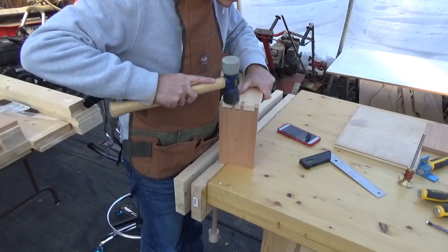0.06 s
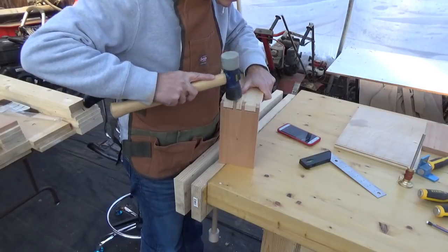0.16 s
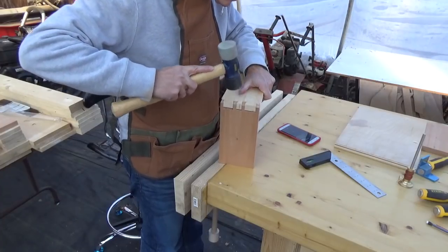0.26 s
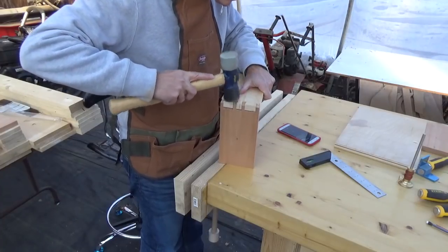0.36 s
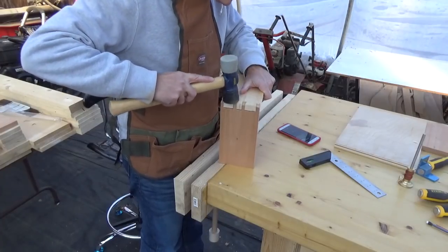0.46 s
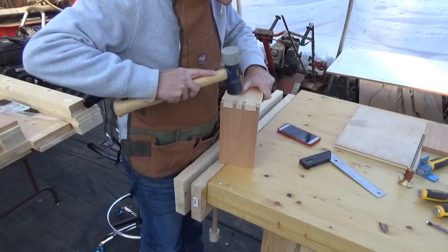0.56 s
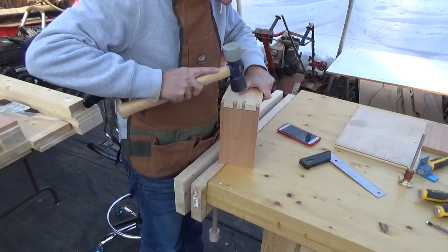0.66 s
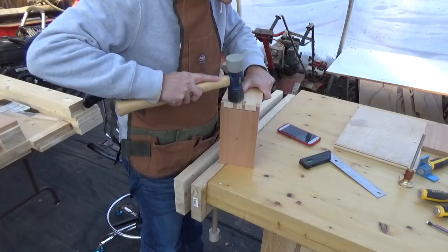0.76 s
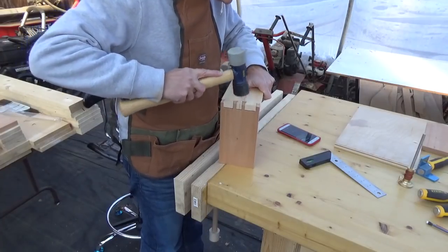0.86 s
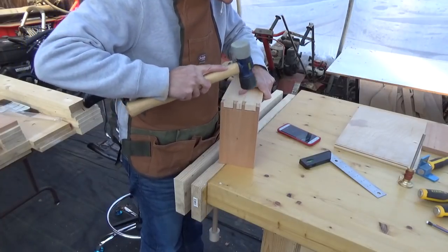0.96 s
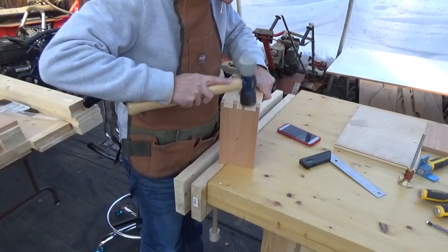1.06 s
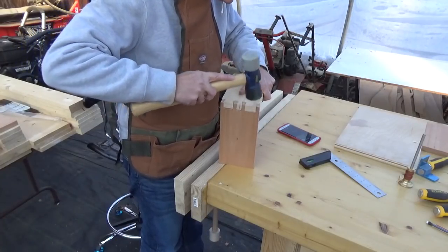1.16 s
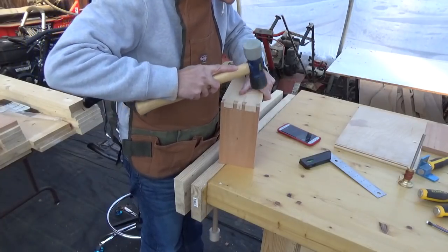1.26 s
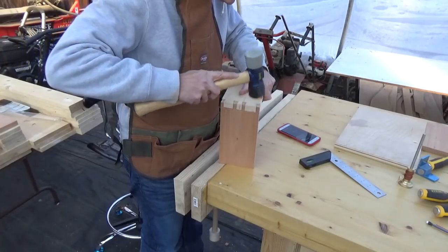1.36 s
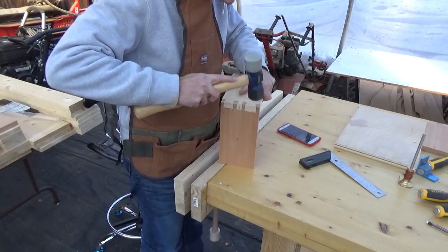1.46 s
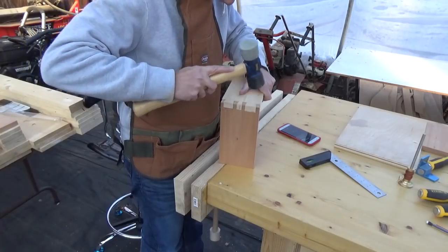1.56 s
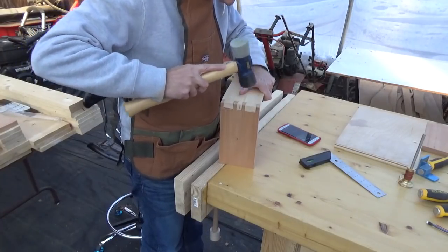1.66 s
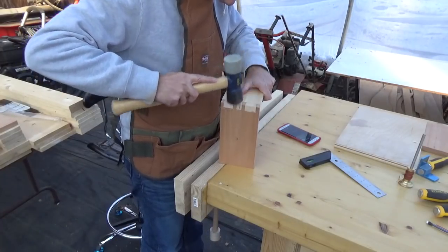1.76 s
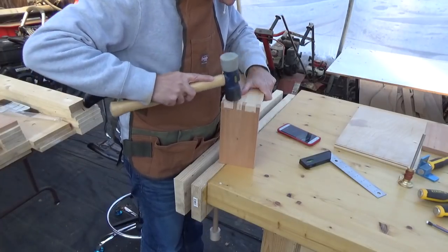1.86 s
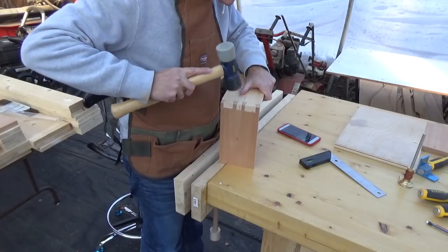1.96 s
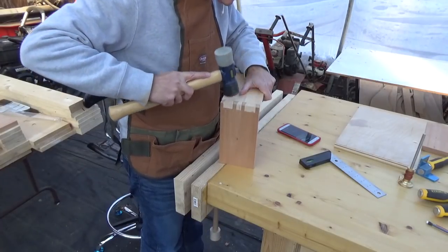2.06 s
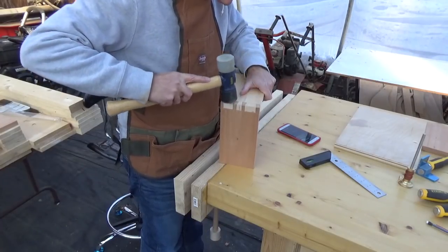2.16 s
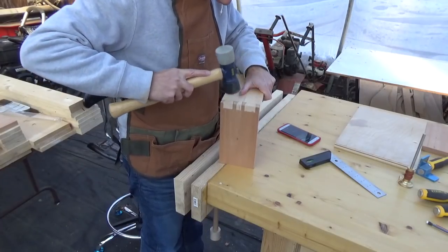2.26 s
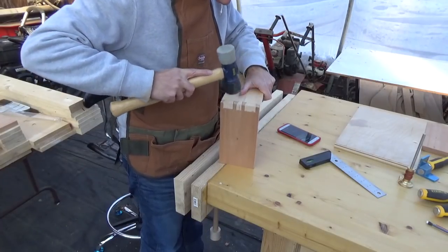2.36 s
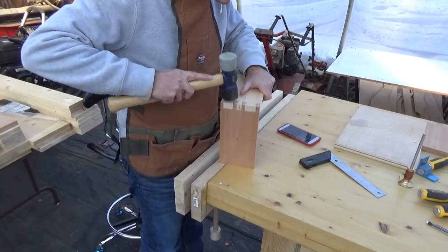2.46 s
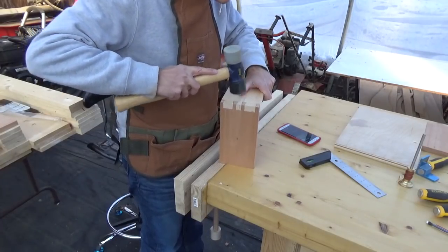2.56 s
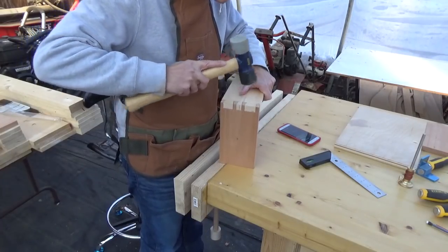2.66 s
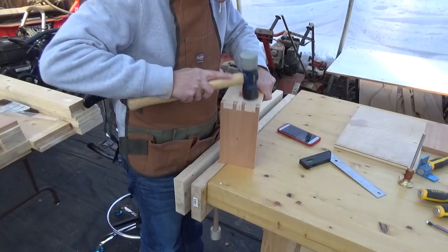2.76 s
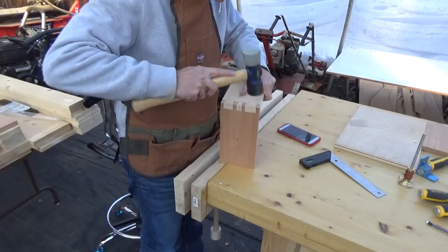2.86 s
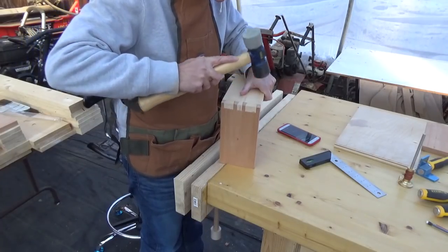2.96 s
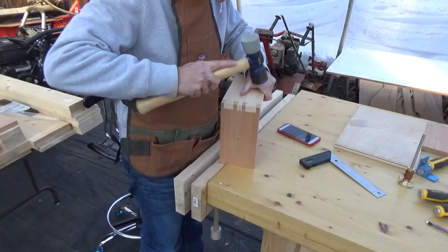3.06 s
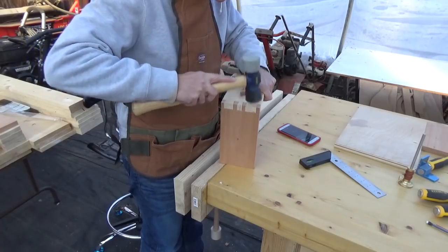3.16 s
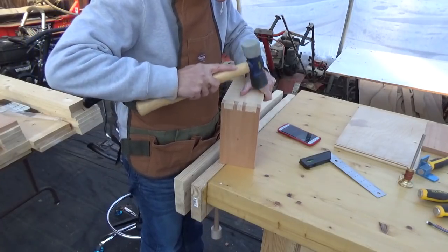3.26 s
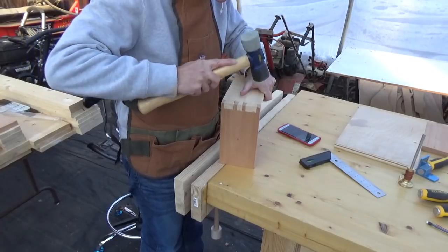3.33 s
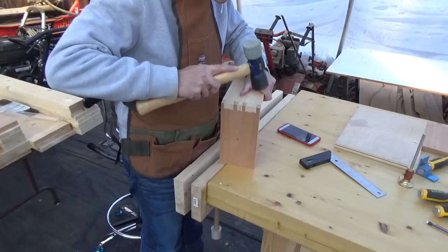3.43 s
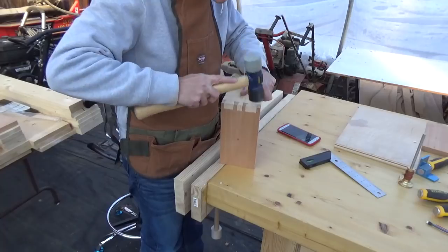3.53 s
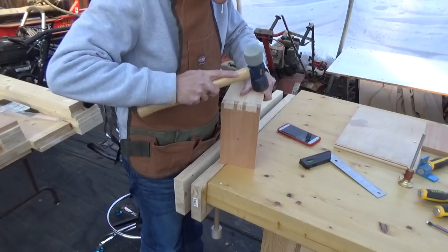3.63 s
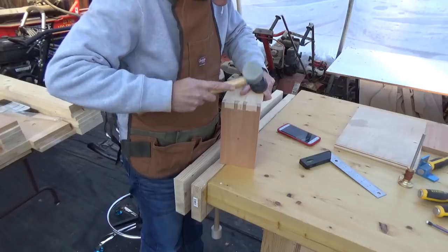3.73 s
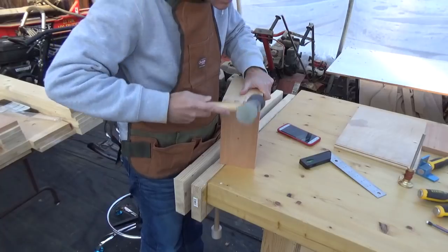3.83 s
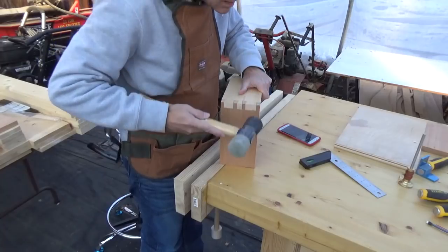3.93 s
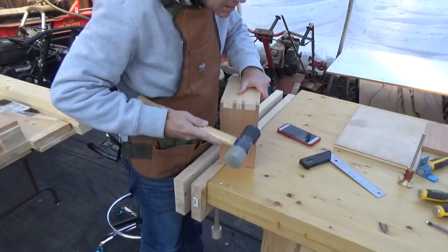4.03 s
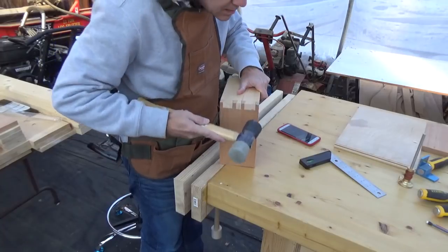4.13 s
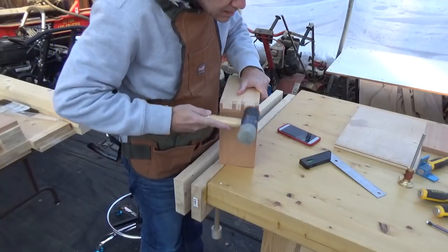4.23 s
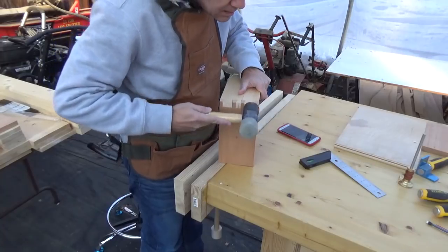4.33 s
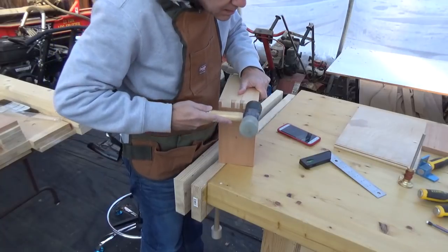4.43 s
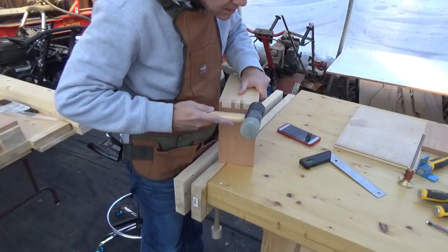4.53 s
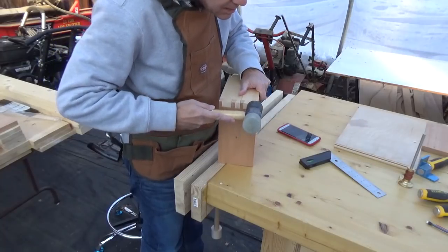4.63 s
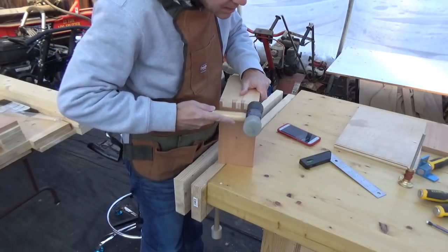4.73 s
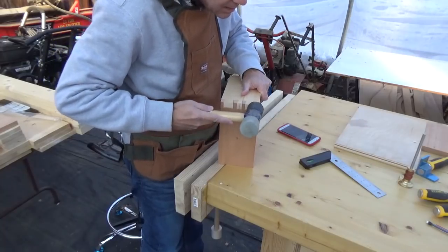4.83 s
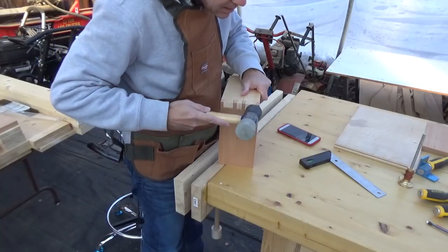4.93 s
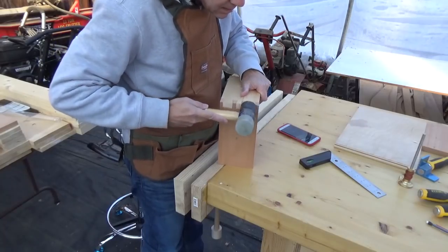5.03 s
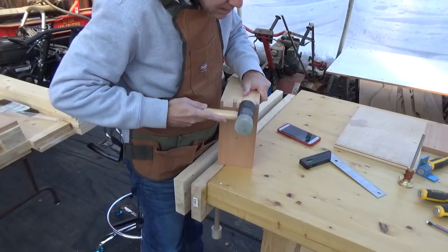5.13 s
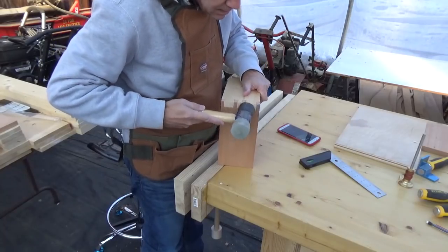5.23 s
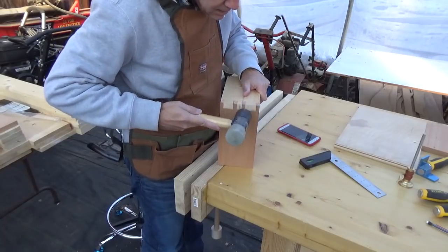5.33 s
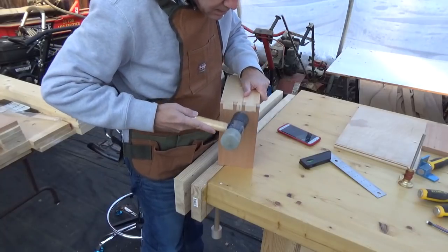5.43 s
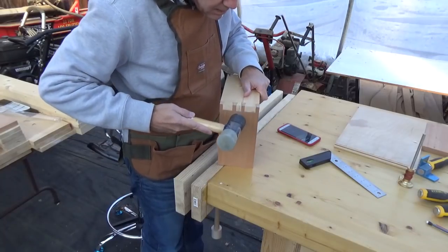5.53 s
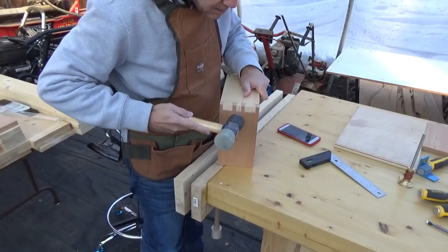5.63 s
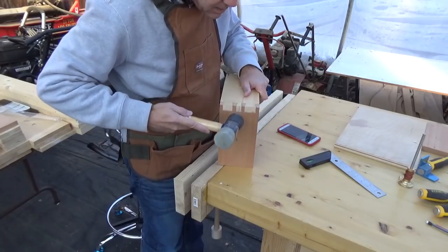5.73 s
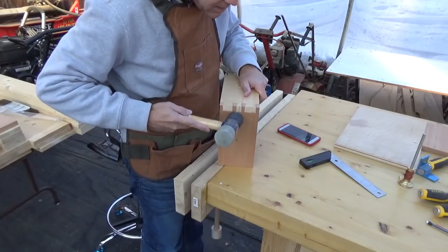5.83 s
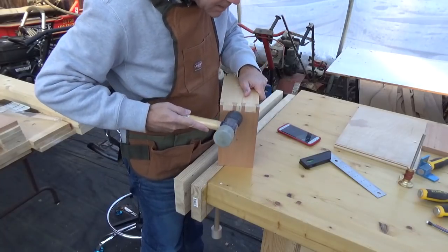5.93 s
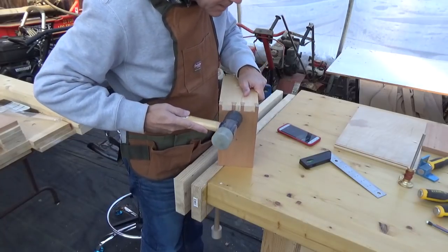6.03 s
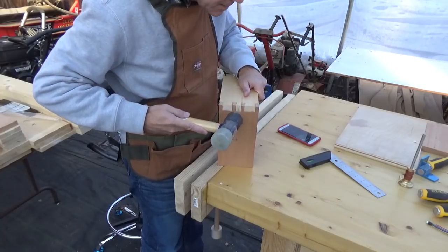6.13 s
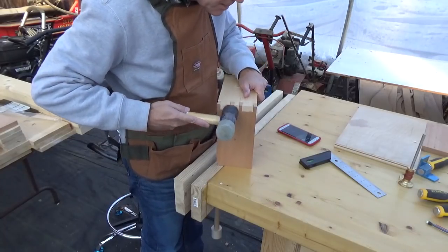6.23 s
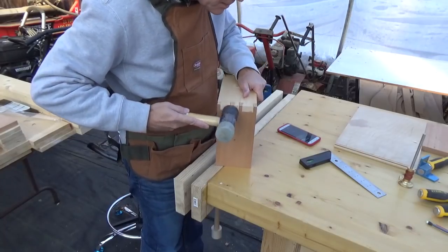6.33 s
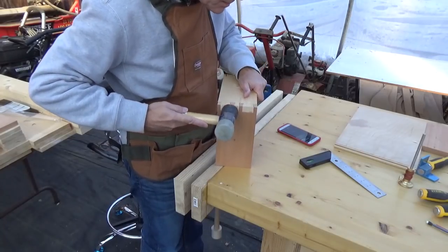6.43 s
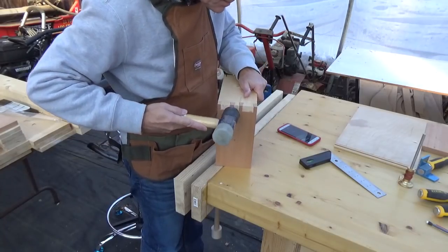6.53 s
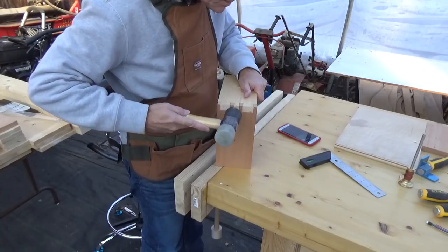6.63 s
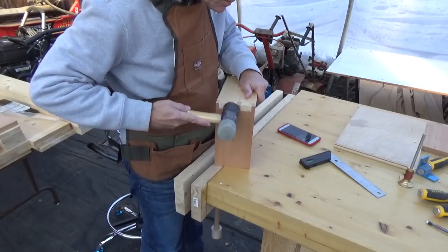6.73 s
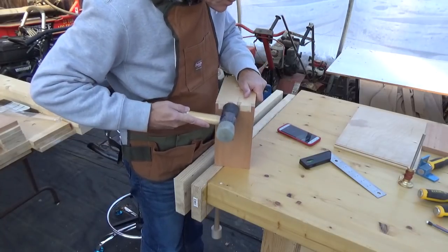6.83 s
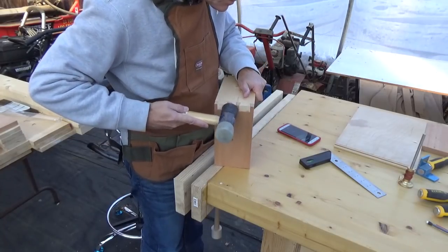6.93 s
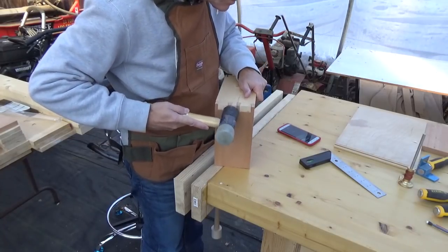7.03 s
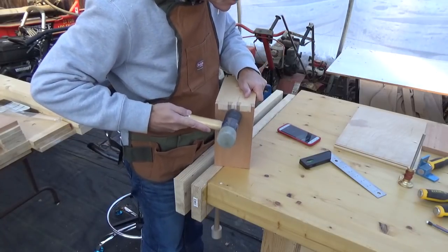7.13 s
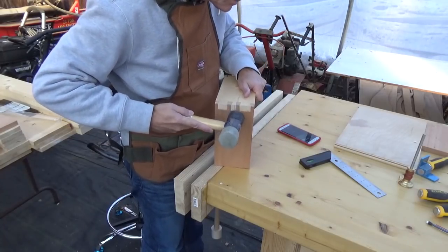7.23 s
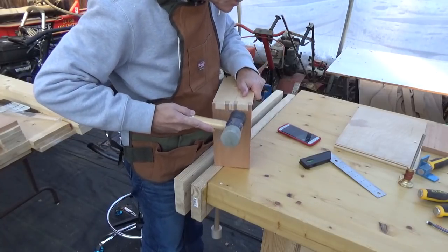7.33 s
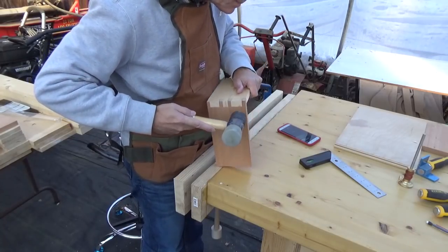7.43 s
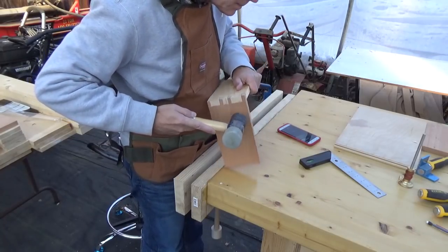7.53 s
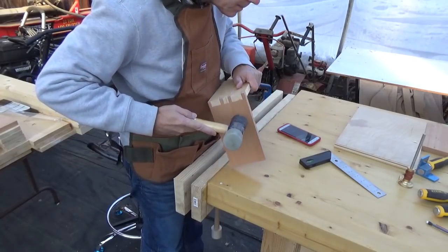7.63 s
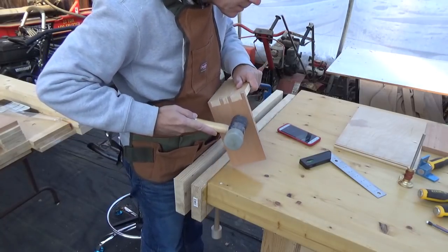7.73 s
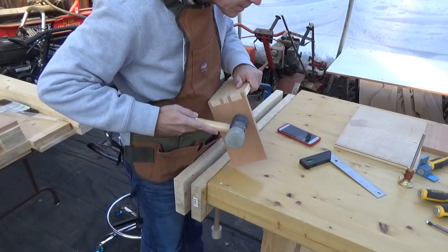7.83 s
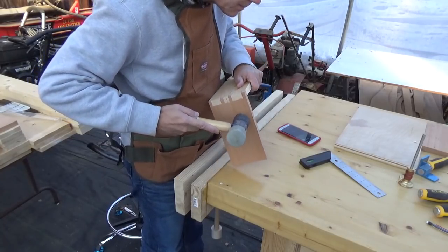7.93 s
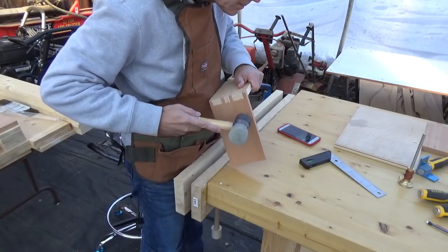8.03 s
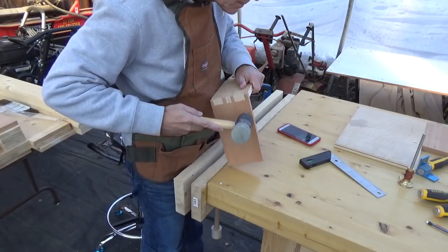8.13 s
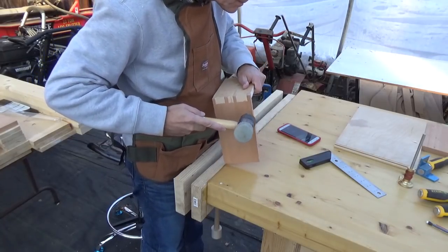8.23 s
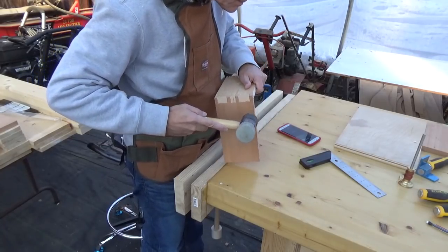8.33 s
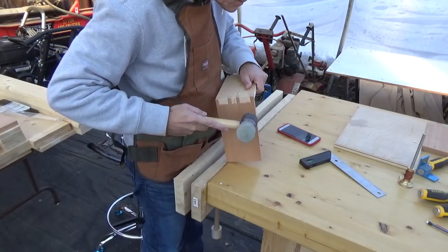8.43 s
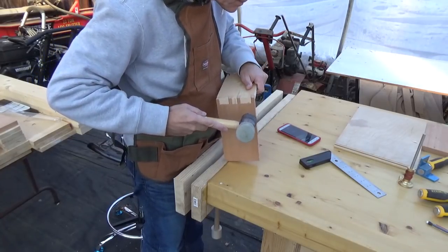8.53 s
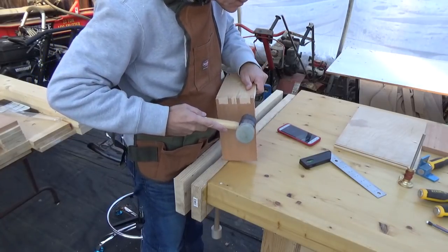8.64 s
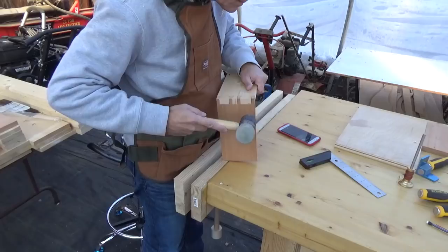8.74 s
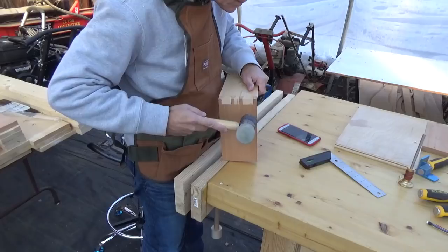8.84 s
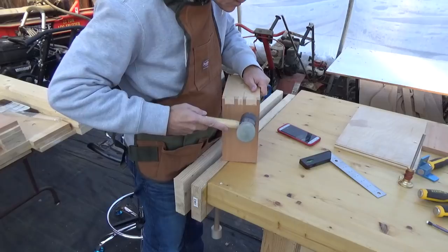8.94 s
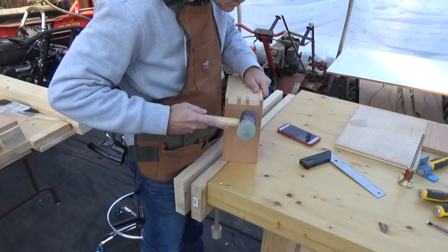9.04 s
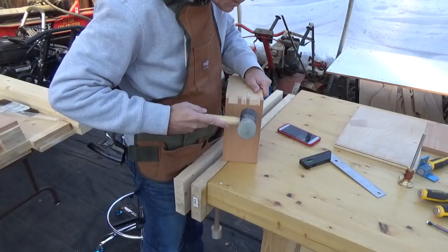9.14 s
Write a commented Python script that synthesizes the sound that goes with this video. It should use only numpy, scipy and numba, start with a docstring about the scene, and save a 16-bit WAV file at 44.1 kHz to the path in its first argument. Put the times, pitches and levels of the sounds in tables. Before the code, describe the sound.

A soft, steady low rush fills a small workshop throughout. Almost at once a mallet starts driving a wooden joint together: eleven evenly spaced blows, about three a second, from 0.1 to 3.5 seconds. Each is a solid woody thud with a sharp click and a short room echo. They gain bass and weight as the joint seats, and the hardest, near 1.5 seconds and from 2.5 to 3.5, set loose steel on the bench faintly jingling. Lighter, thinner taps on the face of the board follow at about 4.3, 4.7 and 5.1 seconds, then after a pause at 6.3 and 6.7. Faint, brief squeaks of tight wood slip in around these taps. From about 7.5 to 9 seconds there are only a few quiet squeaks and rubs as the board is shifted by hand, over the same low rush. Everything sounds fairly close.

```python
"""A steady low rush fills a small workshop, and almost at once a mallet starts driving a dovetail home.
Eleven blows from above excite the modes of work, vise and bench; the bass grows as the joint seats,
and the hardest blows set loose steel jingling. Lighter taps then land on the face of the board, and
the wood squeaks and rubs as it is shifted. The room answers every knock with reflections and a short
diffuse tail, and a limiter flattens the peaks."""
import sys
import numpy as np
from scipy import signal
from scipy.fft import rfft, irfft
from scipy.io import wavfile
from scipy.ndimage import uniform_filter1d
from numba import njit

SR = 44100
rng = np.random.default_rng(int(sys.argv[2]) if len(sys.argv) > 2 else 0)


def inscribe(sig):
    """Save sig as 16-bit PCM at rate SR to the path in sys.argv[1].

    A 1-D sig is mono; a 2-D sig holds one channel per row.
    Samples are clipped to [-1, 1] before scaling.
    """
    pcm = np.round(np.clip(np.atleast_2d(sig).T, -1, 1) * 32767)
    wavfile.write(sys.argv[1], SR, pcm.astype(np.int16))


N = 405279
AGE = np.arange(SR * 6 // 10) / SR  # seconds since the onset of one short sound
HZ = np.fft.rfftfreq(len(AGE), 1 / SR)  # frequency axis of such a sound
MEDIUM_FORCE_DB = -13

# Spectrum of the background. Each row: frequency in Hz, relative level in dB.
RUSH_SPECTRUM = [(15, -10), (25, -19.5), (64, -4), (83, -0.5), (104, -6), (169, -3.5), (207, -4), (241, -3),
                 (311, -5.5), (362, -5.5), (505, -11), (545, -7), (2580, -20), (6280, -24), (11000, -35.5),
                 (14300, -95), (22000, -120)]
# Stereo width of the background. Each row: frequency in Hz, side level against mid in dB.
RUSH_WIDTH = [(60, -29), (190, -22.5), (620, -9.5), (2000, -5.5), (11000, -7.5)]
# Mallet blows from above and taps on the board's face.
# Each row: start in seconds, force in dB, contact hardness in dB, note of the struck spot in Hz.
BLOW_STRIKES = [(.0920, -13.5, -2.5, 1930), (.428, -14, 6, 1020), (.7780, -13, -1, 3396),
                (1.1220, -12.5, -0.5, 1204), (1.4579, -8, 1, 2010), (1.8273, -14, -1.5, 773),
                (2.1447, -11, 3.5, 2083), (2.4615, -7.5, 3.5, 640), (2.842, -6.5, 0, 1307),
                (3.1917, -6, 2.5, 1570), (3.5477, -5.5, 0, 2070)]
TAP_STRIKES = [(4.2912, -14.5, -0.5, 1542), (4.6688, -23.5, 2.5, 1550), (5.0850, -27, 0, 3010),
               (5.0945, -17, -11.5, 423), (6.2708, -20, 1.5, 415), (6.7335, -16.5, 5.5, 1240)]
# Spectra of a blow's thud, a tap's thud, the contact click, steel chattering on the bench,
# and hand rubbing on board. Each row: frequency in Hz, relative level in dB.
BLOW_SPECTRUM = [(30, -57), (60, -43), (95, -3), (145, -6), (235, -1.5), (410, -1), (650, -4), (900, -2.5),
                 (1650, -12), (2150, -15.5), (3600, -28.5), (5200, -31), (8200, -35), (11000, -48)]
TAP_SPECTRUM = [(50, -8), (110, -0.5), (220, -7.5), (440, -0.5), (600, -4.5), (1000, -7), (1290, 6.5),
                (1550, -12.5), (1900, -15.5), (3000, -17), (5500, -27), (11000, -45.5)]
CLICK_SPECTRUM = [(300, 16.5), (2000, -3), (3050, 5.5), (3800, -1.5), (5200, 1), (7500, -11),
                  (11000, -19.5)]
CHATTER_SPECTRUM = [(500, -8), (2000, 12), (3500, 12), (5400, 12), (7200, 3), (9000, 5.5), (11000, -38)]
RUB_SPECTRUM = [(500, 4), (1300, -5), (3000, -7), (6000, -15), (11000, -21)]
# First reflections from floor and walls. Each row: delay in seconds, left gain, right gain.
REFLECTIONS = [(.0092, 0.4, 0.31), (0.016, .4, 0.38), (0.022, 0.87, 1), (0.031, 0.23, 0.27)]
# Normal modes of the clamped work with its bench, of the loose steel, and of the board's face.
# Each row: frequency in Hz, relative level in dB.
WORKBENCH_MODES = [(97, -10), (107, -3), (176, -3.5), (223, 7), (290, -32), (325, 6.5), (366, 4), (406, -1),
                   (468, 4), (562, -9), (604, 6.5), (693, 5.5), (754, 5), (862, 5.5), (923, 2.5),
                   (1025, -13), (1160, -33), (1235, -8), (1323, 1), (1505, -2.5)]
LOOSE_STEEL_MODES = [(2982, 1.5), (3978, -10), (4183, 1), (4786, -2), (4996, 4.5), (5390, -4), (5539, -4),
                     (6352, -2), (6400, 7), (7160, -29), (7779, -14), (8252, -9), (8310, 0), (8800, -29),
                     (10314, -3.5)]
BOARD_FACE_MODES = [(238, -9), (325, -1), (406, 3), (468, 2.5), (556, 2), (692, -4), (802, -2.5),
                    (1130, -4), (1228, -5.5), (1272, -9), (1325, 9.5), (1505, -24)]
# Slips of the wood as it is held and shifted.
# Each row: midpoint in seconds, length in seconds, level in dB, share of squeak from 0 to 1.
SLIPS = [(4.648, 0.052, -44, 0.45), (4.822, 0.1, -47, 0.6), (5.061, 0.063, -41.5, 0.5),
         (6.257, 0.087, -40.5, 0.6), (6.711, 0.11, -45.5, 0.55), (7.458, 0.052, -45.5, 0.62),
         (7.81, 0.0087, -44, 0.3), (7.87, 0.039, -50, .02), (8.412, 0.052, -44, 0),
         (8.551, 0.032, -42.5, 0.55), (8.942, 0.17, -54, 0.2)]
# Resonances of the tight joint as it slips. Each row: frequency in Hz, width in Hz, relative level in dB.
JOINT_RESONANCES = [(1350, 160, -1), (3500, 400, -2), (5300, 300, -7), (5950, 400, -9), (6450, 250, -9)]


def undb(db):
    """Amplitude ratio of a level in decibels."""
    return 10 ** (np.asarray(db) / 20)


def unit(x):
    """Normalisation to rms 1."""
    return x / np.sqrt(np.mean(x ** 2))


def curve(points, hz):
    """Interpolation of (Hz, dB) points in log frequency, falling 6 dB per octave below the first."""
    point_hz, db = np.transpose(points)
    hz = np.maximum(hz, 1)
    return np.interp(np.log(hz), np.log(point_hz), db) + 20 * np.log10(np.minimum(hz / point_hz[0], 1))


def colour(x, spectrum, size=4096):
    """Minimum-phase filtering to a given spectrum; white noise keeps its power."""
    cepstrum = irfft(np.log(undb(curve(spectrum, np.fft.rfftfreq(size, 1 / SR)))))
    causal = 2 * cepstrum * (np.arange(size) < size // 2)
    response = irfft(np.exp(rfft(causal)))
    return signal.fftconvolve(x, response[None] / np.linalg.norm(response))[:, :x.shape[1]]


def filtered(x, response):
    """Linear filtering: the spectrum of a short sound is multiplied by a frequency response."""
    return irfft(rfft(x) * response, len(AGE))


def resonance(centre_hz, width_hz):
    """Frequency response of a damped oscillator, gain 1 at its centre."""
    return 1j * HZ * width_hz / (centre_hz ** 2 - HZ ** 2 + 1j * HZ * width_hz)


def fade(t60):
    """Exponential decay of 60 dB in t60 seconds."""
    return undb(-60 * AGE / t60)


def noise(side_db):
    """Partly correlated stereo noise: the weaker the side signal, the narrower the image."""
    mid, side = rng.standard_normal((2, len(AGE)))
    return mid + undb(side_db) * np.array([side, -side])


def add(out, start_s, sound):
    """Superposition of a sound on the mix."""
    start = max(int(start_s * SR), 0)
    out[:, start:start + sound.shape[1]] += sound[:, :out.shape[1] - start]


def rush(level_db=-44.5):
    """Stationary low noise, coherent between left and right in the bass and wider above."""
    mid, side = colour(rng.standard_normal((2, N)), RUSH_SPECTRUM)
    width = undb(curve(RUSH_WIDTH, np.fft.rfftfreq(N, 1 / SR)))
    side = irfft(rfft(side) * width, N)
    return (mid + np.array([side, -side])) * undb(level_db)


def room(still_field, direct_db, echo_db, t60, build_s):
    """Impulse response: direct pulse, reflections, and a diffuse tail that varies as the worker moves."""
    field = 0.78 * still_field + 0.54 * noise(side_db=-2)
    out = field * (1 - np.exp(-AGE / build_s)) * fade(t60)
    out[:, 0] += undb(direct_db)
    for delay_s, left, right in REFLECTIONS:
        out[:, int(delay_s * SR)] += undb(echo_db) * np.array([left, right])
    return out


def mode_phases(modes, spread_rad):
    """Phase difference: each mode arrives left and right with its own phase."""
    turn, skew = rng.random(len(modes)), rng.choice([-1, 1], len(modes))
    return 2 * np.pi * turn + spread_rad * np.array([skew, -skew])


def ring(modes, phases, t60, droop, scatter_db, detune, build_cycles=0):
    """Free vibration: low modes last longest; each strike varies their tuning and weight a little."""
    hz, db = np.transpose(modes)[:, :, None]
    hz = hz * (1 + detune * rng.standard_normal(hz.shape))
    gain = undb(db + scatter_db * rng.standard_normal(hz.shape))
    gain = gain / np.sqrt(np.sum(gain ** 2) / 2)
    decay = fade(t60 * (hz / np.median(hz)) ** -droop)
    swell = 1 - np.exp(-AGE * hz / (build_cycles + 1e-9))
    return np.sum(gain * decay * swell * np.sin(2 * np.pi * hz * AGE + phases[..., None]), axis=1)


def tilt(start_s, force_db, hardness_db, bass_db, middle_db, seating_s=0.47, slack_corner_hz=214):
    """Coupling: a hard contact passes more treble, and the joint passes little bass until it seats."""
    bass = bass_db - 0.4 * (force_db - MEDIUM_FORCE_DB)  # bass grows more slowly than the force
    middle = middle_db + 0.087 * hardness_db
    looseness = np.exp(-(start_s - BLOW_STRIKES[0][0]) / seating_s)
    slack_db = -8.5 * looseness / (1 + (HZ / slack_corner_hz) ** 4)
    balance = [(1, bass), (110, bass), (200, 0), (550, 0), (1350, middle), (4500, hardness_db)]
    return undb(slack_db + curve(balance, HZ))


def dispersion(lag_cycles):
    """Dispersion: low bending waves travel slower in wood, so the thud follows the crack."""
    return np.exp(-2j * np.pi * lag_cycles * np.log(np.maximum(HZ, 1)))


def knocks(strikes, spectrum, modes, lag_cycles, direct_db, echo_db, room_t60, build_s,
           ring_db, ring_t60, bass_db, middle_db, spot_db, spot_db_per_octave, spot_t60,
           click_db, click_per_hardness, click_t60, click_room_db, pan_db):
    """Impact excitation: mallet on wood gives a click, a broad thud through the room and ringing modes."""
    out = np.zeros((2, N))
    still_field, phases = noise(side_db=-8), mode_phases(modes, spread_rad=0.09)
    for start_s, force_db, hardness_db, spot_hz in strikes:
        thud = colour(room(still_field, direct_db, echo_db, room_t60, build_s), spectrum)
        tone = ring(modes, phases, ring_t60, droop=0.18, scatter_db=1, detune=0.0039, build_cycles=1.08)
        balance = tilt(start_s, force_db, hardness_db, bass_db, middle_db)
        body = filtered(thud + undb(ring_db) * tone, balance * dispersion(lag_cycles))
        # the struck spot brings out one note of the board, the weaker the higher it is
        note = unit(filtered(noise(side_db=-9), resonance(spot_hz, width_hz=92) ** 2)) * fade(spot_t60)
        note *= undb(spot_db + spot_db_per_octave * np.log2(spot_hz / 1200))
        # the click depends on the hardness of the contact, not on the weight behind it
        click_decay = fade(click_t60) + undb(click_room_db) * fade(room_t60)
        click = colour(noise(side_db=-17.5) * click_decay, CLICK_SPECTRUM)
        click *= undb(click_db + click_per_hardness * hardness_db)
        knock = undb(force_db) * (body + note) + click
        end_taper = np.minimum(10 * (AGE[-1] - AGE), 1)
        add(out, start_s, knock * end_taper)
    return out * undb(np.array([[pan_db], [-pan_db]]) / 2)


def blows():
    """Coupled vibration: blows from above shake the clamped work and its bench together."""
    return knocks(BLOW_STRIKES, BLOW_SPECTRUM, WORKBENCH_MODES, lag_cycles=1.2, pan_db=-1.4,
                  direct_db=15, echo_db=17, room_t60=0.28, build_s=0.0083,
                  ring_db=-3, ring_t60=0.24, bass_db=5, middle_db=1,
                  spot_db=-11.5, spot_db_per_octave=-6.5, spot_t60=0.3,
                  click_db=-19.5, click_per_hardness=0.16, click_t60=0.034, click_room_db=-12.5)


def loose_steel(lag_s=0.017, chatter_s=0.025, bounces=6, ring_db=-2, ring_t60=0.18, swell_s=0.0093):
    """Nonlinear rattling: steel jumps at a hard blow, lands a moment later and chatters as it rings."""
    out = np.zeros((2, N))
    for start_s, force_db, *_ in BLOW_STRIKES:
        level_db = -42.5 + 3.01 * (force_db - MEDIUM_FORCE_DB)  # about the cube of the force
        landing_s = chatter_s * (np.arange(bounces) + rng.random(bounces) / 2) / bounces
        landings = np.zeros((1, len(AGE)))
        landings[0, (landing_s * SR).astype(int)] = 1 / np.sqrt(bounces)
        contact = colour(noise(side_db=-11) * (fade(0.26) + 3 * fade(0.021)), CHATTER_SPECTRUM)
        chatter = signal.fftconvolve(contact, landings)[:, :len(AGE)]
        phases = mode_phases(LOOSE_STEEL_MODES, spread_rad=0.3)
        tone = ring(LOOSE_STEEL_MODES, phases, ring_t60, droop=0.07, scatter_db=3.5, detune=0.0012)
        # the landings feed the ring, so its decay is held off until they stop
        decay_held_off = np.maximum(fade(ring_t60), undb(-60 * chatter_s / ring_t60))
        feed = np.minimum(AGE / swell_s, 1) / decay_held_off
        add(out, start_s + lag_s, undb(level_db) * (chatter + undb(ring_db) * tone * feed))
    return out


def taps():
    """Modal response: lighter taps on the board's face excite its own modes, with little bass."""
    return knocks(TAP_STRIKES, TAP_SPECTRUM, BOARD_FACE_MODES, lag_cycles=1.0, pan_db=-0.8,
                  direct_db=27.5, echo_db=17, room_t60=0.3, build_s=0.0019,
                  ring_db=0.5, ring_t60=0.21, bass_db=-15.5, middle_db=-2,
                  spot_db=-6, spot_db_per_octave=-5.5, spot_t60=0.26,
                  click_db=-13.5, click_per_hardness=2.15, click_t60=0.0092, click_room_db=-22)


def scuffs(grain_db=2, grain_samples=200):
    """Friction: brief grainy slips make the joint squeak in its resonances while hand and board rub."""
    out = np.zeros((2, N))
    joint = unit(sum(undb(db) * np.abs(resonance(hz, width)) ** 2 for hz, width, db in JOINT_RESONANCES))
    for midpoint_s, length_s, level_db, squeak_share in SLIPS:
        swell = np.sin(np.pi * np.minimum(AGE / length_s, 1))
        grain = np.repeat(rng.standard_normal(len(AGE)), grain_samples)[:len(AGE)]
        friction = noise(side_db=-16) * undb(grain_db * grain)
        squeak = np.sqrt(squeak_share) * filtered(friction, joint)
        rub = np.sqrt(1 - squeak_share) * colour(friction, RUB_SPECTRUM)
        add(out, midpoint_s - length_s / 2, undb(level_db) * swell * (squeak + rub))
    return out


def scene():
    """Superposition of blows, taps, steel and scuffs on the background."""
    return blows() + taps() + loose_steel() + scuffs() + rush()


@njit
def follow_peaks(level, release):
    """Envelope detection: an instant rise, then a fall by a fixed share each sample."""
    out, held = np.empty(len(level)), 0.
    for i in range(len(level)):
        held = max(level[i], held * release)
        out[i] = held
    return out


def record(dry, ceiling_db=-13, release_s=0.041, cutoff_hz=11000):
    """Limiting, then a low-pass: clicks slip through while the body of a knock is held down."""
    power = uniform_filter1d(np.mean(dry ** 2, axis=0), size=132)  # 3 ms average
    level = follow_peaks(np.sqrt(np.abs(power)) + 1e-9, np.exp(-1 / (release_s * SR)))
    gain = uniform_filter1d(np.minimum(1, undb(ceiling_db) / level), size=45)
    low_pass = signal.ellip(10, 0.2, 80, cutoff_hz, fs=SR, output="sos")
    return signal.sosfilt(low_pass, dry * gain)


dry = scene()
out = record(dry)
inscribe(out)
```